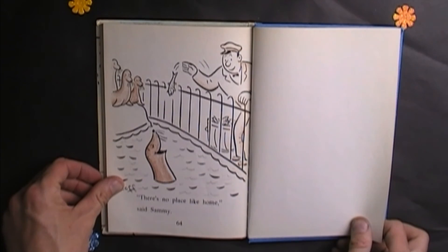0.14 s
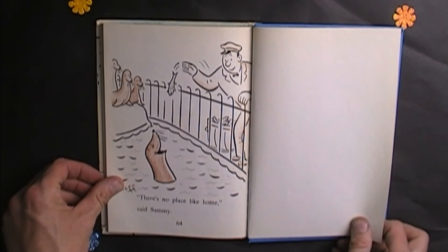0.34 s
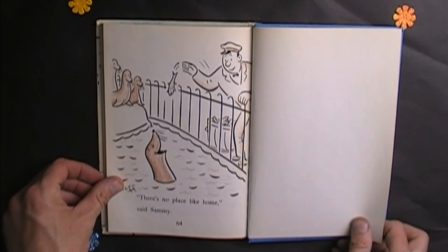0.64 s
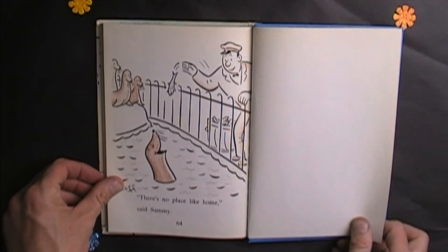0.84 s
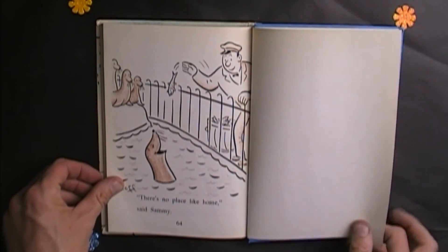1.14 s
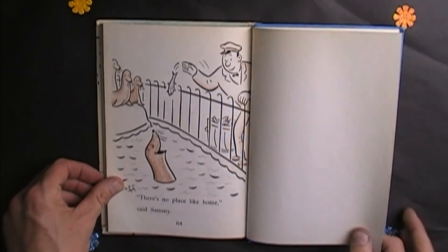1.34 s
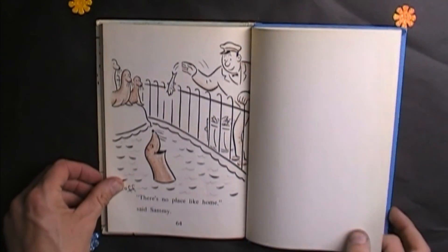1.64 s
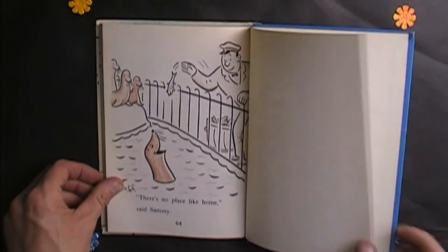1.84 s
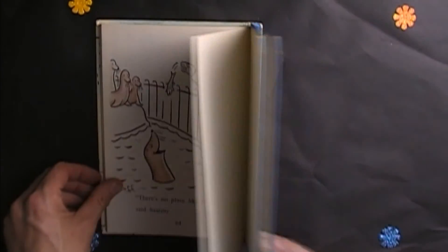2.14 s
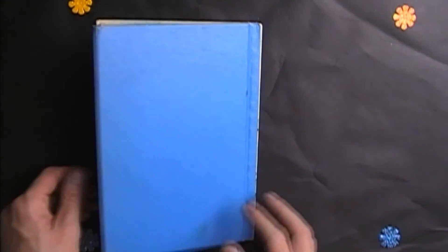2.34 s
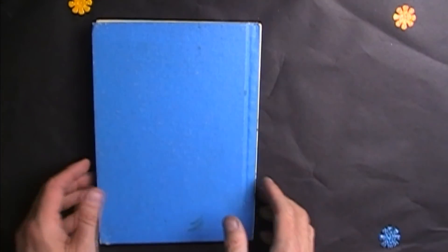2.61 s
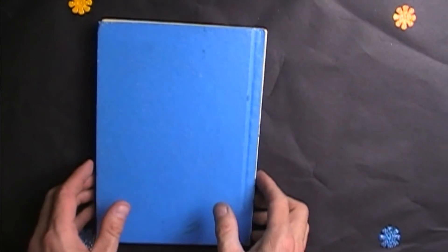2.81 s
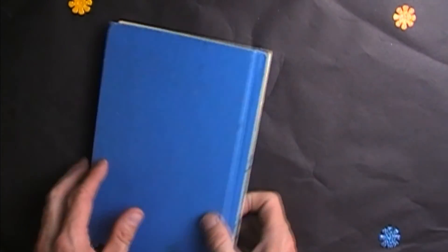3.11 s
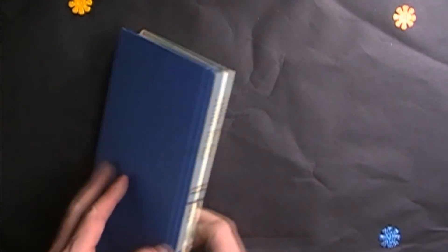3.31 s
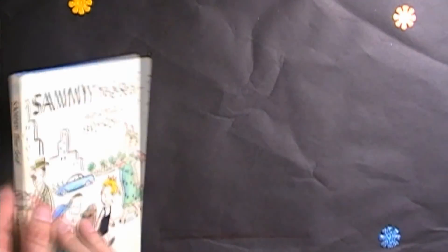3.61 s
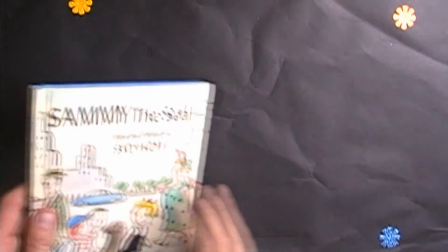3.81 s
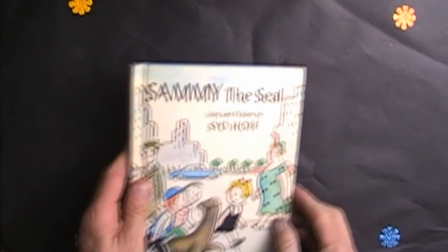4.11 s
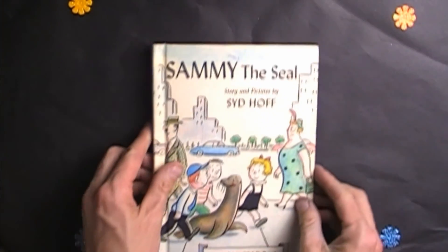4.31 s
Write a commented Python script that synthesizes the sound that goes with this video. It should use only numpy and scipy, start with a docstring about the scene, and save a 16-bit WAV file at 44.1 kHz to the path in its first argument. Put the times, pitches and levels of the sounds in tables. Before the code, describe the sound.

In a small, quiet room with a faint hum, a hardcover book is handled close to the microphone. Light spine creaks, small clicks and hissing paper lead to three crisp snaps as it closes. The shut book is dragged softly and tipped onto its edge, hitting the table with a loud, briefly ringing thud. Soft rubbing and a couple of small ticks follow.

```python
"""Closing a hardcover book.

On a paper-covered table in a small, quiet room with a faint appliance hum, fingers slide over the pages
and lift the back cover; paper hisses and rubs in tiny slips. The binding creaks and snaps as it shuts.
The book is dragged, tipped onto its edge with a thud that rings in book, table and room, and slid back."""
import sys
import numpy as np
from scipy import signal
from scipy.fft import rfft, irfft
from scipy.io import wavfile
from scipy.ndimage import uniform_filter1d

SR = 44100
rng = np.random.default_rng(int(sys.argv[2]) if len(sys.argv) > 2 else 0)


def wav_out(sig):
    """Save sig, one row per channel (or a flat mono array), as 16-bit PCM at SR to the path in sys.argv[1]."""
    wavfile.write(sys.argv[1], SR, np.round(np.clip(np.atleast_2d(sig).T, -1, 1) * 32767).astype(np.int16))


N = 196421
TIME_S = np.arange(N) / SR
RING_S = TIME_S[:SR // 2]
FREQ_HZ = np.maximum(np.fft.rfftfreq(N, 1 / SR), 1)


def undb(db):
    """Decibels to gain."""
    return 10 ** (np.asarray(db) / 20)


def unit_rms(x):
    """Scale to rms 1."""
    return x / np.sqrt(np.mean(x ** 2))


def at_hz(table, hz):
    """Interpolate (f/Hz, value) rows over log frequency."""
    points_hz, values = np.transpose(table)
    return np.interp(np.log(hz), np.log(points_hz), values)


def gain_curve(rows):
    """Smoothed gain from (t/s, level/dB) rows, silent outside them."""
    t_s, db = np.transpose(rows)
    inside = (TIME_S >= t_s[0]) & (TIME_S <= t_s[-1])
    return uniform_filter1d(undb(np.interp(TIME_S, t_s, db)) * inside, size=600)


def colour(x, spectrum):
    """Filter by (f/Hz, level/dB) rows."""
    return irfft(rfft(x) * undb(at_hz(spectrum, FREQ_HZ)), N)


def walk(rate_hz):
    """Random wander, rms 1."""
    return unit_rms(np.interp(TIME_S * rate_hz, np.arange(4000), rng.standard_normal(4000)))


def stereo(mid, side, width):
    """Left and right from mid and side, the side filtered by width."""
    side = colour(side, width)
    return np.array([mid + side, mid - side])


def add(track, t_s, sound):
    """Mix a sound in at t_s."""
    start = int(t_s * SR)
    track[start:start + len(sound)] += sound[:N - start]


def click(spectrum, tilt_db_oct=0):
    """Minimum-phase pulse with the given spectrum, peak 1."""
    magnitude = undb(at_hz(spectrum, FREQ_HZ) + tilt_db_oct * np.log2(FREQ_HZ))
    cepstrum = irfft(np.log(magnitude), N)
    log_response = rfft(2 * cepstrum[1:N // 2], N) * np.exp(-2j * np.pi * FREQ_HZ / SR)
    pulse = irfft(np.exp(log_response), N)[:len(RING_S)]
    return pulse / np.abs(pulse).max()


def decay(t60_s):
    """Exponential decay."""
    return np.exp(-np.log(1000) * RING_S / t60_s)


def ring(modes):
    """Struck modes (f/Hz, level/dB, t60/s); neighbours swing in opposite directions."""
    return sum((-1) ** k * undb(db) * decay(t60_s) * np.sin(2 * np.pi * hz * RING_S)
               for k, (hz, db, t60_s) in enumerate(modes))


def band_noise(hz, q, shape):
    """Noise passed twice through one resonance, rms 1."""
    band = signal.iirpeak(hz, q, fs=SR)
    return unit_rms(signal.lfilter(*band, signal.lfilter(*band, rng.standard_normal(shape))))


def slips(grain_db, patchy_db):
    """Friction: dense tiny slips of uneven size, catching and letting go."""
    size = undb(grain_db * np.minimum(rng.exponential(size=N), 6))
    slipping = rng.random(N) < 0.2
    return rng.standard_normal(N) * slipping * size * undb(patchy_db * walk(70))


# side re mid, diffuse sound: f/Hz, level/dB
DIFFUSE_WIDTH = [(60, -29), (200, 0), (550, -1.5), (1200, -2), (3000, -1)]
# reverberation time: f/Hz, t60/s
REVERB_T60 = [(150, 0.15), (700, 0.36), (2000, 0.21), (8000, 0.16)]


def room(x, wet_db, build_s):
    """Direct sound plus diffuse reflections that build up, then decay octave by octave."""
    length = len(RING_S)
    mid, side = rng.standard_normal((2, N))
    noise = rfft(stereo(mid, undb(-6.5) * side, DIFFUSE_WIDTH)[:, :length])
    octave = np.log2(np.clip(np.fft.rfftfreq(length, 1 / SR), 64, 8192))
    tail = sum(irfft(noise * np.maximum(1 - abs(octave - k), 0), length)
               * decay(at_hz(REVERB_T60, 2 ** k)) for k in range(6, 14))
    build_up = 1 - np.exp(-(RING_S / build_s) ** 2)
    tail = unit_rms(tail * build_up) / np.sqrt(length)
    return x + undb(wet_db) * signal.fftconvolve(x[None], tail, axes=1)[:, :N]


# room noise spectrum: f/Hz, level/dB
AIR_SPECTRUM = [(15, -69), (25, -50), (46, -14.5), (91, -22), (114, -6), (225, -13), (256, -4.5),
                (313, -10.5), (355, -4.5), (635, -8.5), (905, -7), (1360, -14), (1580, -12.5), (2140, -18),
                (10500, -36), (13600, -77), (22000, -120)]
# appliance hum lines: f/Hz, level/dB
HUM_LINES = [(119, -73), (253, -106), (350, -81.5), (727, -82.5), (925, -73), (1083, -71)]


def background():
    """Room noise and wavering hum; the lowest line stands in the room, stronger and earlier at left."""
    mid, side = (unit_rms(colour(rng.standard_normal(N), AIR_SPECTRUM)) for _ in range(2))
    air = undb(-58) * stereo(mid, side, DIFFUSE_WIDTH)
    lines = []
    for hz, db in HUM_LINES:
        amplitude = np.sqrt(2) * undb(db + 0.96 * walk(5.07))
        phase = 2 * np.pi * hz * TIME_S + 0.5 * walk(3.97)
        lines.append(amplitude * np.exp(1j * phase))
    standing = np.outer([1.6, 0.98 * np.exp(-1.2j)], lines[0])
    return air + np.real(standing + sum(lines[1:]))


# creaks of the glued spine: t/s, level/dB
SPINE_CREAKS = [(0.599, -44.5), (0.701, -54.5), (0.854, -51), (0.947, -47), (1.174, -38.5), (1.445, -46),
                (1.559, -47), (1.766, -46)]
# spine modes: f/Hz, level/dB, t60/s
SPINE_MODES = [(2515, -8, 0.017), (2720, -21, 0.031), (3430, -9.5, 0.016), (4160, -19.5, 0.035)]


def spine_creaks():
    """The bent spine grates faintly and gives way in short bursts that ring its modes."""
    rise_s, t60_s = 0.008, 0.025
    strain = gain_curve([(0.62, -66.5), (1.3, -62), (2.1, -61.5), (2.6, -73)])
    friction = slips(grain_db=2.5, patchy_db=3.5) * strain
    burst = decay(t60_s) * (1 - decay(rise_s))
    for t_s, db in SPINE_CREAKS:
        add(friction, t_s, undb(db) * rng.standard_normal(len(RING_S)) * burst)
    body = ring(SPINE_MODES)
    ringing = signal.fftconvolve(friction, body / np.linalg.norm(body))[:N]
    crackle = signal.sosfilt(signal.butter(2, [1800, 5000], "band", fs=SR, output="sos"), friction)
    return room(ringing + crackle, wet_db=-8.5, build_s=0.00099)


def stroke(start_s, length_s):
    """Gain of one slide: a power of hand speed, from rest to rest."""
    speed = np.sin(np.pi * np.clip((TIME_S - start_s) / length_s, 0, 1))
    return uniform_filter1d(speed ** 0.59, size=700)


def shifting_contact(x, patchy_db):
    """Each half-octave of a rubbing sound swells and fades by itself as the contact shifts."""
    spectrum = rfft(x)
    half_octave = 2 * np.log2(np.clip(FREQ_HZ / 1024, 1, 8))
    return sum(irfft(spectrum * np.maximum(1 - abs(half_octave - k), 0), N) * undb(patchy_db * walk(14))
               for k in range(7))


# friction spectra of paper fibres, open pages and shut cover: f/Hz, level/dB
FIBRE_SPECTRUM = [(1200, -18.5), (2400, -9.5), (3600, -3), (4600, -3), (6200, -2), (8000, -2), (9300, -5.5),
                  (10600, -16.5)]
PAGE_SPECTRUM = [(300, -15), (700, -2.5), (930, 0), (1180, -4), (1520, 4.5), (2000, 0.5), (2800, -14),
                 (5000, -22)]
COVER_SPECTRUM = [(150, -28), (400, -4), (650, 4), (950, 0), (1400, 3), (2200, -1), (5000, -11)]
# side re mid, sound from the table: f/Hz, level/dB
NEAR_WIDTH = [(4500, -10), (6300, -11), (8000, -3.5), (10000, -3)]
# slides of paper on paper, skin and table: t/s, length/s, hiss level/dB, rub level/dB
HAND_STROKES = [(0.963, 0.4, -55, -63.5), (1.086, 0.17, -47, -68), (1.345, 0.072, -51, -64),
                (1.61, 0.11, -43, -52.5), (1.713, 0.17, -53, -61.5), (1.889, 0.18, -53.5, -71),
                (2.03, 0.27, -61, -69), (2.28, 0.14, -48.5, -61.5), (2.39, 0.2, -58, -79),
                (2.613, 0.11, -51, -78), (2.72, 0.11, -53.5, -60), (2.853, 0.17, -53, -59),
                (2.985, 0.24, -50, -54.5), (3.015, 0.05, -45, -57), (3.192, 0.41, -45.5, -57),
                (3.393, 0.11, -40.5, -50.5), (3.943, 0.071, -53.5, -74), (4.032, 0.085, -50, -61.5),
                (4.081, 0.24, -51, -62.5), (4.292, 0.48, -49, -55)]


def paper_sliding():
    """Paper fibres hiss; under pressure the open pages, later the stiff shut cover, add a hollow rub."""
    touch_s, shut_s = 0.82, 2.35
    # fingertips stay lightly on the book between strokes
    touch = undb(-66.5 + 0.5 * walk(3.77)) * np.clip((TIME_S - touch_s) / 0.05, 0, 1)
    power = sum(np.outer(undb([hiss_db, rub_db]), stroke(t_s, length_s)) ** 2
                for t_s, length_s, hiss_db, rub_db in HAND_STROKES)
    slide, press = np.sqrt(power)
    fibres = [colour(slips(grain_db=1.3, patchy_db=0.9), FIBRE_SPECTRUM) for _ in range(2)]
    mid, side = (unit_rms(shifting_contact(x, patchy_db=1.7)) for x in fibres)
    hiss = stereo(mid, side, NEAR_WIDTH) * np.hypot(slide, touch)
    grain = slips(grain_db=2, patchy_db=1.2)
    pages = unit_rms(colour(grain, PAGE_SPECTRUM))
    cover = unit_rms(colour(grain, COVER_SPECTRUM))
    shut = np.clip((TIME_S - shut_s) / 0.1, 0, 1)
    rub = (pages * (1 - shut) + cover * shut) * press
    return hiss + room(rub, wet_db=-0.5, build_s=0.0054)


# bumps of fingers and flexing pages: t/s, level/dB, f/Hz, t60/s
SOFT_BUMPS = [(1.029, -45.5, 920, 0.073), (1.043, -36.5, 890, 0.048), (1.203, -40.5, 1310, 0.054),
              (1.387, -46.5, 1650, 0.074), (1.657, -43, 1830, 0.081), (1.827, -46, 1390, 0.11),
              (2.764, -50.5, 219, 0.21), (3.072, -47.5, 940, 0.093), (4.234, -41, 756, 0.044),
              (4.438, -46.5, 800, 0.13)]


def soft_bumps():
    """Each soft contact is a short scuff through one broad resonance."""
    track = np.zeros(N)
    for t_s, db, hz, t60_s in SOFT_BUMPS:
        add(track, t_s, undb(db) * band_noise(hz, q=1.9, shape=len(RING_S)) * decay(t60_s))
    return room(track, wet_db=-10, build_s=0.0042)


# snap spectrum: f/Hz, level/dB
SNAP_SPECTRUM = [(150, -30), (500, -10.5), (1400, -2.5), (2200, -5), (3400, 1.5), (4800, -0.5), (6500, 5),
                 (8000, 3), (10500, -9)]
# binding snaps and page-edge ticks: t/s, level/dB, tilt/(dB/octave), flutter level/dB
BINDING_SNAPS = [(1.2283, -28.5, -1.5, -11), (1.364, -39, -6, -6), (1.3888, -30.5, -2, -11),
                 (1.4563, -41, 1, -6.5), (1.969, -14, 0.5, -17.5), (2.1842, -14, 5, -21),
                 (2.3366, -5.5, 0.5, -18), (4.074, -32, -4.5, -16), (4.324, -40, -4.5, -5.5)]


def binding_snaps():
    """Each snap is a sharp pulse, a very brief bright ring near 7.4 kHz and a flutter of the sheet."""
    mid, side = np.zeros((2, N))
    bright_ring = ring([(7400, -6.5, 0.00057)])
    flutter_envelope = decay(0.019) * (1 - decay(0.0029))
    for t_s, db, tilt_db_oct, flutter_db in BINDING_SNAPS:
        pulse = undb(db) * (click(SNAP_SPECTRUM, tilt_db_oct) + bright_ring)
        flutter = undb(flutter_db) * rng.standard_normal((2, len(RING_S))) * flutter_envelope
        flutter_mid, flutter_side = signal.fftconvolve(pulse[None], flutter, axes=1)[:, :len(RING_S)]
        add(mid, t_s, pulse + flutter_mid)
        add(side, t_s, flutter_side)
    return room(mid, wet_db=-10, build_s=0.0036) + stereo(0, side, NEAR_WIDTH)


def finger_squeal():
    """A fingertip gliding off the glossy cover sings very high for a moment."""
    mid, side = band_noise(hz=9200, q=16, shape=(2, N))
    swell = gain_curve([(2.42, -69), (2.48, -63), (2.55, -59.5), (2.58, -86)])
    return stereo(mid, side, NEAR_WIDTH) * swell


# left boost and equal right cut: f/Hz, level/dB
BASS_BALANCE = [(190, 4.4), (260, 0.1)]
# lead of left over right: f/Hz, phase/rad
BASS_PHASE = [(140, -0.2), (177, 1.2), (200, -1.3), (400, -0.28)]


def standing_bass(x):
    """The thud's bass stands in the room, so left and right differ in level and phase."""
    shift = undb(at_hz(BASS_BALANCE, FREQ_HZ)) * np.exp(0.5j * at_hz(BASS_PHASE, FREQ_HZ))
    return irfft(rfft(x) * np.array([shift, 1 / shift]), N)


# impact spectrum: f/Hz, level/dB
BLOW_SPECTRUM = [(40, -60), (100, -17), (190, -1), (320, -13), (540, 3), (830, 1), (1400, -5), (2200, -13),
                 (3500, -18), (6000, -24.5), (10000, -25)]
# ringing of the thud in book, table and room: f/Hz, level/dB, t60/s
THUD_MODES = [(105, -45.5, 0.19), (175.7, -32, 0.24), (199.3, -18.5, 0.094), (286, -36.5, 0.253),
              (442, -39, 0.21), (481, -22, 0.089), (543, -11.5, 0.076), (577.4, -12, 0.11),
              (693, -33, 0.14), (762, -16.5, 0.1), (794, -17, 0.1), (838, -10.5, 0.091), (840, -37, 0.11),
              (944, -25, 0.2), (1034, -15.5, 0.077), (1253, -10.5, 0.035), (1366, -21, 0.1),
              (1330, -30, 0.12), (1428, -22.5, 0.16), (1595, -26.5, 0.11), (1710, -37, 0.34),
              (1757, -22, 0.11), (2300, -24, 0.064)]


def edge_thud():
    """The edge hits the table: a dull blow that bounces and chatters as the edge settles, a crack of the cover
    and ringing."""
    landing_s, landing_db = 3.4309, -0.5
    gap_step_s, loss_db = 0.00245, 5.5
    blow, ringing = np.zeros((2, N))
    pulse = click(BLOW_SPECTRUM)
    bounce_s = landing_s
    for k in range(6):  # the blow, then the edge bounces, each contact weaker and later
        bounce_s += k * gap_step_s
        add(blow, bounce_s, undb(landing_db - k * loss_db) * pulse)
    crack = undb(0.5) * click(SNAP_SPECTRUM, tilt_db_oct=14.5)
    add(blow, landing_s + 0.00123, crack)
    knock = ring([(857, -12.5, 0.041)])  # the struck edge, damped by the hands
    knock = signal.sosfilt(signal.butter(2, 220, "high", fs=SR, output="sos"), knock)
    add(ringing, landing_s, ring(THUD_MODES) + knock)
    return standing_bass(room(blow, wet_db=-2, build_s=0.00071) + ringing)


def scene():
    """The handling of the book over the quiet room."""
    return (background() + spine_creaks() + paper_sliding() + soft_bumps()
            + binding_snaps() + finger_squeal() + edge_thud())


def record(dry):
    """Soft clip, bass cut, brief end fade, treble cut."""
    ceiling, low_hz, top_hz, fade_s = 0.94, 45, 10600, 0.004
    rounded = ceiling * np.tanh(dry / ceiling)
    thinned = signal.sosfilt(signal.butter(2, low_hz, "high", fs=SR, output="sos"), rounded)
    fade_out = np.clip((TIME_S[-1] - TIME_S) / fade_s, 0, 1) ** 2
    return signal.sosfilt(signal.ellip(10, 0.2, 70, top_hz, fs=SR, output="sos"), thinned * fade_out)


dry = scene()
out = record(dry)
wav_out(out)
```